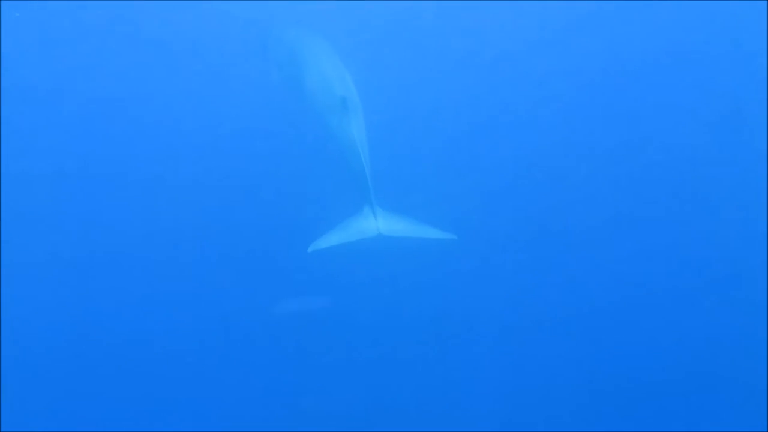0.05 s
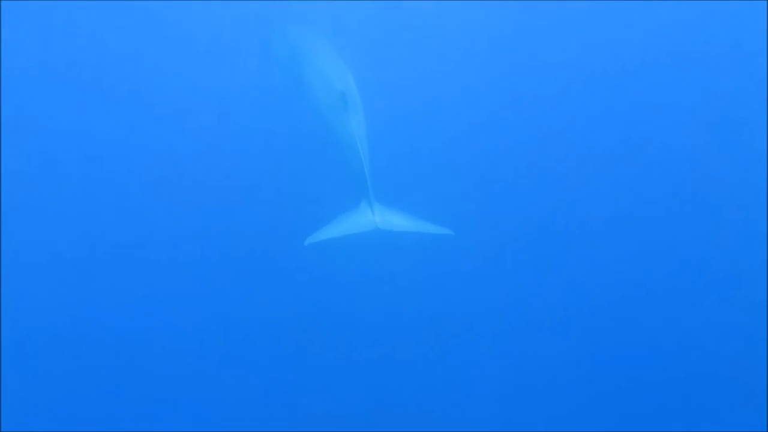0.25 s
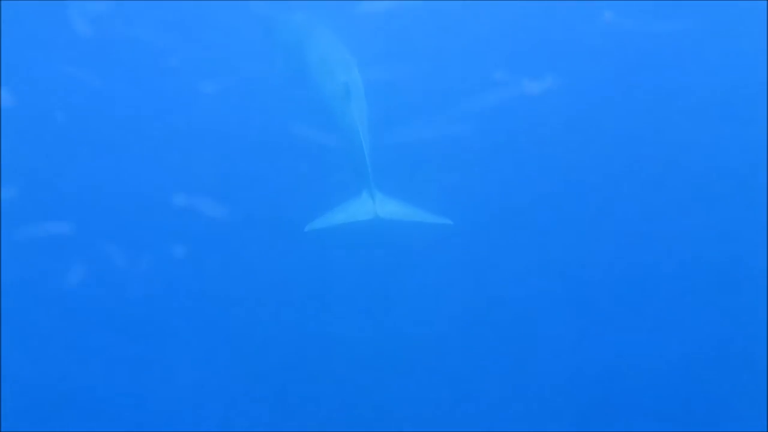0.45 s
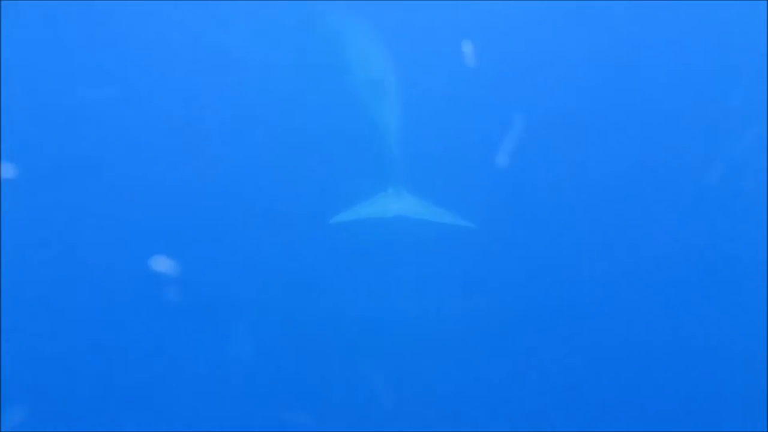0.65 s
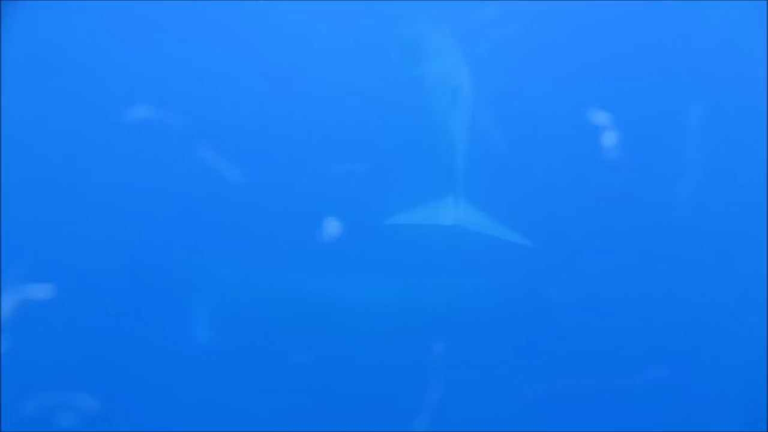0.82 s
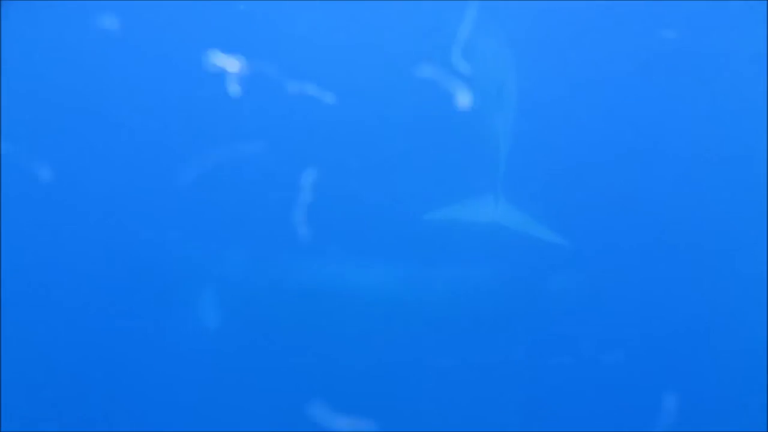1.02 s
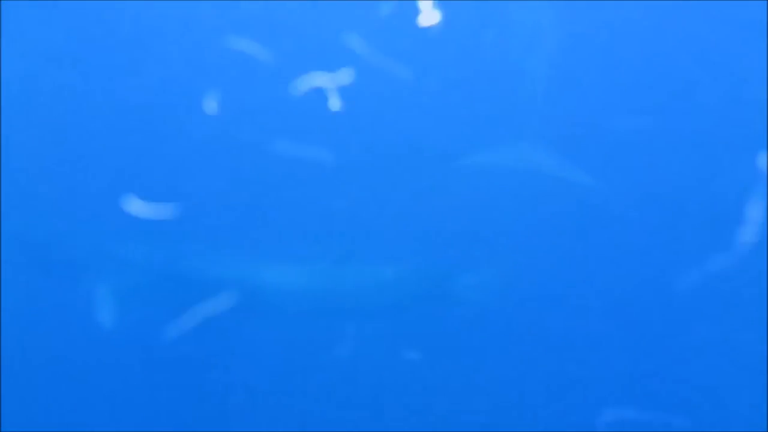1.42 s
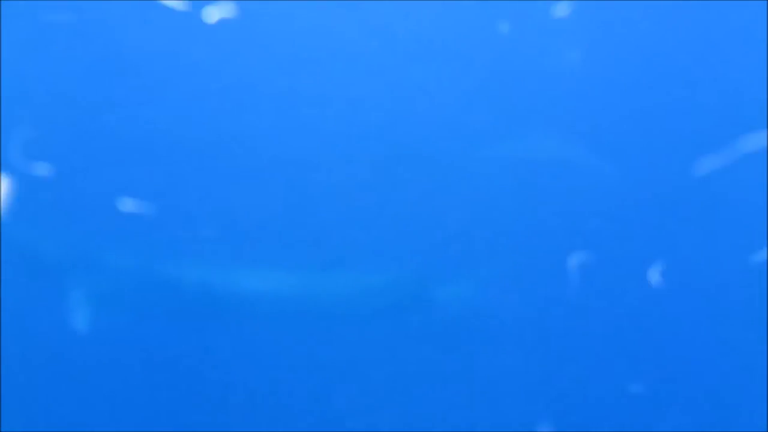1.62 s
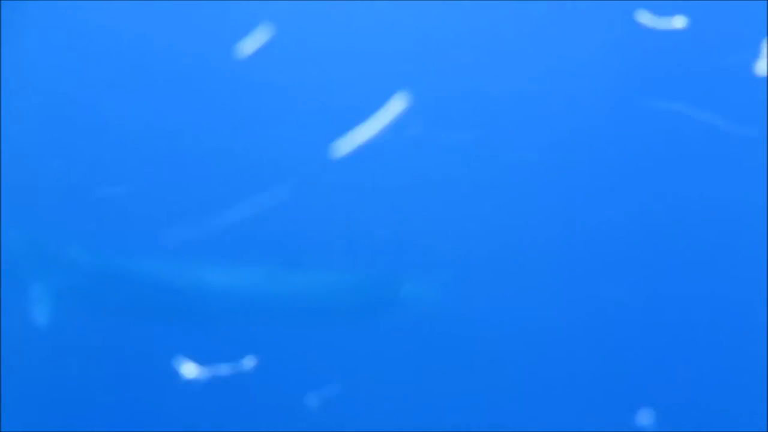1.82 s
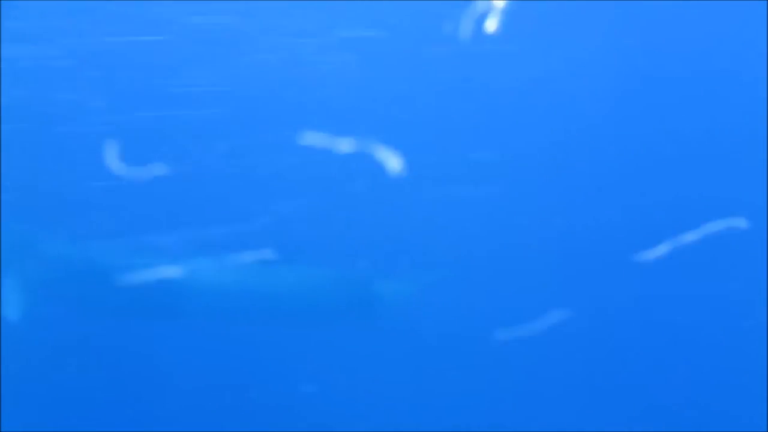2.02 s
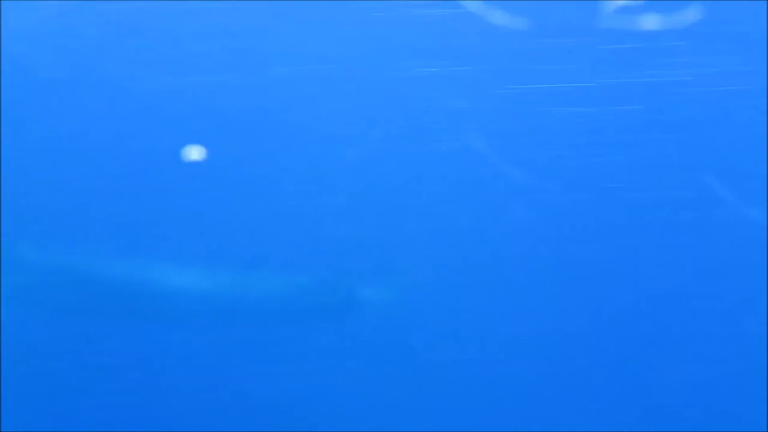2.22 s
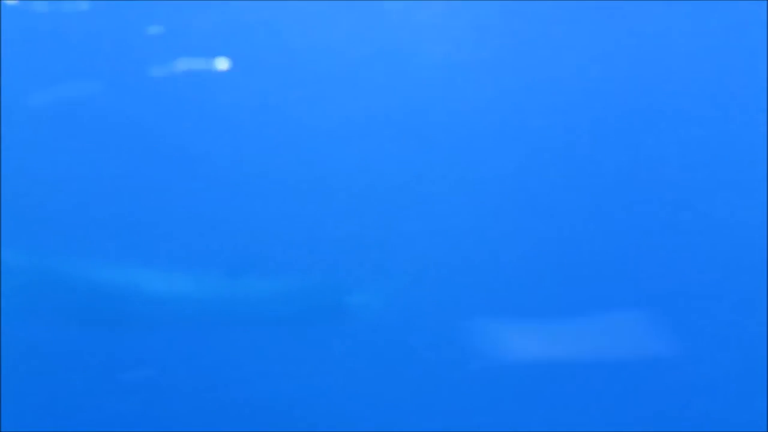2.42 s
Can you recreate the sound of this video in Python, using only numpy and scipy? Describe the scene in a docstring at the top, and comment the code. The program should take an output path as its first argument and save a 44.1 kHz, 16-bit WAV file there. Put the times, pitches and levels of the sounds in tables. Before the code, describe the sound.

Bubbles gurgle around a submerged camera in the open sea. A few quiet glugs give way to a sudden churning wash with trickling, fizz and small frothy slaps, ending in one big gulp over a low rumble.

```python
"""A wash of air bubbles hits a camera housing just under the surface of the open sea, after a few quiet glugs.
Each bubble is a short ring that rises in pitch as it fades: big ones gulp and gurgle, smaller ones
churn and trickle, the finest fizz and spit on the case. Froth slaps and cracks against it, and near
the end one big air pocket bends upward. The loud gulps ring the hollow housing, over the low
rumble of the flow and a faint hiss."""
import sys
import numpy as np
from scipy import signal
from scipy.fft import rfft, irfft, next_fast_len
from scipy.io import wavfile
from scipy.ndimage import uniform_filter1d

SR = 44100
rng = np.random.default_rng(int(sys.argv[2]) if len(sys.argv) > 2 else 0)


def wrap_up_sound(samples):
    """Save the sound to the file named by the first command line argument, as 16-bit audio."""
    columns = np.atleast_2d(samples).T
    # keep every value between -1 and 1, then stretch to whole-number steps
    tamed = np.clip(columns, -1, 1)
    steps = np.round(tamed * 32767).astype(np.int16)
    wavfile.write(sys.argv[1], SR, steps)


N = 112454


def undb(db):
    """Decibels to gain."""
    return 10 ** (np.asarray(db) / 20)


def unit(x):
    """Scale to rms 1."""
    return x / np.sqrt(np.mean(x ** 2))


def curve(rows, column=1):
    """Automation lane: one column of a timed table, interpolated at every sample."""
    rows = np.array(rows, float)
    return np.interp(np.arange(N) / SR, rows[:, 0], rows[:, column])


def colour(x, points, share=1):
    """Minimum-phase EQ through (freq_hz, gain_db) points; share scales the decibels."""
    size = 2 * next_fast_len(N)
    hz, db = np.array(points, float).T
    freqs = np.maximum(np.arange(size // 2 + 1) * SR / size, 1)
    gain = undb(share * np.interp(np.log(freqs), np.log(hz), db))
    cepstrum = irfft(np.log(gain))
    cepstrum[1:size // 2] *= 2  # folded onto positive time, so attacks have no pre-ring
    cepstrum[size // 2 + 1:] = 0
    return irfft(rfft(x, size) * np.exp(rfft(cepstrum)))[..., :N]


def fade(t60):
    """Time axis and envelope of a decay that drops 60 dB in t60 seconds."""
    t = np.arange(int(1.5 * t60 * SR) + 2) / SR
    return t, np.exp(-np.log(1000) * t / t60)


def flicker(rate_hz, depth_db):
    """Slewed sample-and-hold gain: a new random level rate_hz times a second."""
    hold = max(int(SR / rate_hz), 2)
    steps = np.repeat(rng.standard_normal(4000)[:N // hold + 1], hold)
    return undb(depth_db * uniform_filter1d(steps, hold // 2)[:N])


def add(out, start_s, sound):
    """Mix a sound in at start_s."""
    i = int(np.clip(start_s * SR, 0, N - 1))
    out[..., i:i + sound.shape[-1]] += sound[..., :N - i]


def bubble(hz, t60, min_swell_s=0):
    """A bubble swells for about a cycle, then rises in pitch as it fades; complex, peak 1."""
    swell_cycles, rise_per_t60 = 0.86, 0.084
    t, decay = fade(t60)
    swell_s = max(swell_cycles / hz, min_swell_s)
    envelope = decay * (1 - np.exp(-(t / swell_s) ** 2))
    phase = 2 * np.pi * hz * t * (1 + rise_per_t60 * t / t60 / 2)
    return envelope / envelope.max() * np.exp(1j * phase)


def swarm(low_hz, high_hz, per_s, t60_cycles, spread_db, width=0):
    """Bubbles at random times and pitches; width (0 to 1) puts left and right out of phase."""
    out = np.zeros((2, N))
    for when, pitch, size, ring, turn, lag in rng.random((8000, 6))[:int(per_s * N / SR)]:
        hz = low_hz * (high_hz / low_hz) ** pitch
        t60 = t60_cycles / hz * 2 ** (2 * ring - 1)  # half to double the typical ring
        gain = undb(-spread_db * np.log(.015 + size))  # many quiet, a few loud
        phases = np.exp(2j * np.pi * np.array([[turn], [turn + width * (lag - .5)]]))
        add(out, when * N / SR, gain * (phases * bubble(hz, t60)).imag)
    return out


def hiss_bed():
    """A faint, even hiss under everything, part wide and part centred."""
    # hiss EQ: freq_hz, gain_db
    eq = [(1000, -3), (3000, -3), (8500, -17.5), (15000, -28.5)]
    noise = rng.standard_normal((2, N)) + rng.standard_normal(N)
    return undb(-71) * unit(colour(noise, eq))


def rumble():
    """Eddies in the flow press on the housing: low, surging noise."""
    # surges of the flow: time_s, level_db
    levels = [(0, -52.5), (.32, -54.5), (.38, -43), (.55, -49), (.85, -43.5), (1.15, -41.5), (1.35, -46.5),
              (1.75, -44), (1.95, -51), (2.1, -47.5), (2.55, -52.5)]
    # rumble EQ: freq_hz, gain_db
    eq = [(15, -34), (30, -11), (50, -4.5), (80, 3), (96, -2.5), (113, 4.5), (135, -5), (200, -27),
          (400, -9.5), (1500, -65)]
    return unit(colour(rng.standard_normal(N), eq)) * undb(curve(levels))


def lapping():
    """Water laps softly at the housing before the wash arrives."""
    # soft laps: time_s, level_db
    levels = [(0, -43), (.06, -61.5), (.085, -47), (.16, -65.5), (.24, -48.5), (.27, -58.5), (.3, -52),
              (.34, -64), (.4, -90)]
    # lapping bubbles: low_hz, high_hz, per_s, t60_cycles, spread_db
    bubbles = (520, 1480, 630, 65, 7.1)
    # lapping EQ: freq_hz, gain_db
    eq = [(300, -6), (750, -8), (1000, -2), (1320, 1.5), (1480, 1), (2500, -18)]
    return unit(colour(swarm(*bubbles), eq)) * undb(curve(levels))


def fizz():
    """The finest bubbles ping in tiny clouds and merge into a soft hiss."""
    # fizz swells, before the 3 dB lift: time_s, level_db
    levels = [(0, -90), (.338, -90), (.346, -58), (.39, -54), (.44, -61), (.46, -70), (.6, -69), (.8, -65),
              (1.1, -68), (1.35, -68), (1.6, -64), (1.68, -56.5), (1.8, -60), (1.95, -61), (1.99, -68),
              (2.12, -66), (2.19, -61), (2.26, -62), (2.3, -73), (2.55, -70.5)]
    # finest bubbles: low_hz, high_hz, per_s, t60_cycles, spread_db
    bubbles = (4000, 16560, 1600, 38, 4.9)
    # tone through the housing: freq_hz, gain_db
    eq = [(1500, -8), (3300, 14), (4300, 0.5), (6500, 2), (7200, -3), (8800, 1), (12900, -3.5),
          (14000, -0.5), (15700, -16)]
    hiss = undb(-2) * rng.standard_normal((2, N))
    pings = unit(swarm(*bubbles, width=1))
    clouds = (pings + hiss) * flicker(rate_hz=110, depth_db=4)
    return unit(colour(clouds, eq)) * undb(curve(levels) + 3)


def cracks():
    """Water breaks on the case in bright snaps about a millisecond long."""
    # snaps: start_s, level_db
    hits = [(0.2025, -56), (0.3452, -40), (1.6458, -35), (2.1849, -41)]
    envelope = np.zeros(N)
    _, decay = fade(t60=0.00083)
    for start_s, db in hits:
        add(envelope, start_s, undb(db) * decay)
    return envelope * np.sign(rng.standard_normal(N))


def spits():
    """Clusters of seven tiny bubbles spit on the case: the first leads, later ones are weaker."""
    # clusters, by lead bubble and before the trim: start_s, level_db, pitch_hz
    clusters = [(0.017, -49, 4600), (0.205, -45, 2600), (0.3635, -40, 8840), (0.380, -35, 4100),
                (0.3902, -31, 4250), (0.3905, -32, 6400), (0.4445, -28, 3100), (0.892, -38.5, 4070),
                (1.4387, -48, 4390), (1.6458, -36, 12500), (1.673, -36, 9900), (1.6778, -39, 4960),
                (1.683, -39, 10800), (1.692, -37, 4800), (1.7241, -34.5, 5900), (1.758, -34.5, 4270),
                (1.7666, -36.5, 6500), (1.8389, -47, 4770), (1.840, -44, 12700), (1.883, -45, 6420),
                (1.9327, -40, 5840), (2.1258, -42, 5340), (2.1849, -44.5, 10300), (2.242, -47, 5680)]
    length_s, t60, scatter_octaves = 0.005, 0.004, 0.39
    trim_db, fall_db = -5.5, -12.5
    out = np.zeros((2, N))
    for (start_s, db, hz), draws in zip(clusters, rng.random((len(clusters), 7, 4))):
        for k, (late, pitch, turn, lag) in enumerate(draws):
            late, octaves = (late, scatter_octaves * (2 * pitch - 1)) if k else (0, 0)
            gain = undb(db + trim_db + fall_db * np.sqrt(late))
            ring = gain * bubble(hz * 2 ** octaves, t60, min_swell_s=t60 / 10)
            phases = np.exp(2j * np.pi * np.array([[turn], [turn + (lag - .5) / 2]]))  # left, right
            add(out, start_s + late * length_s, (ring * phases).imag)
    return out


def slaps():
    """Slugs of frothy water smack the case: noise bursts that build and die."""
    # smacks: start_s, level_db, attack_s, t60_s
    hits = [(0.346, -31, 0.00042, 0.033), (0.864, -31, .002, 0.038), (1.671, -35, 0.0052, 0.077),
            (1.714, -35.5, 0.0045, 0.13), (1.764, -36, 0.0021, 0.055), (1.927, -27.5, 0.017, 0.075),
            (2.069, -31.5, 0.011, 0.039), (2.148, -32.5, 0.004, 0.033), (2.253, -26, 0.0033, 0.038)]
    # smack EQ: freq_hz, gain_db
    eq = [(90, -15.5), (220, 11), (430, 7), (650, -16.5), (900, 1), (1080, -10.5), (1270, 8.5), (1500, -2),
          (1750, -1.5), (2300, -6), (2800, -10.5), (3700, -23.5), (6400, -35), (8100, -34.5), (10000, -34),
          (15000, -54)]
    envelope = np.zeros(N)
    for start_s, db, attack_s, t60 in hits:
        attack = np.linspace(0, 1, int(attack_s * SR) + 1)
        _, decay = fade(t60)
        add(envelope, start_s, undb(db) * np.concatenate([attack, decay]))
    return envelope * unit(colour(rng.standard_normal(N), eq))


def trickle():
    """Tiny bubbles stream past with a bright tinkle."""
    # trickle swells: time_s, level_db
    levels = [(0, -68.5), (.338, -76.5), (.35, -45), (.44, -47), (.48, -65.5), (.7, -51), (1.0, -56.5),
              (1.35, -59.5), (1.6, -49.5), (1.75, -48.5), (2.0, -54.5), (2.26, -51.5), (2.33, -59),
              (2.55, -55)]
    # tiny bubbles: low_hz, high_hz, per_s, t60_cycles, spread_db
    bubbles = (1990, 4450, 900, 48, 4.4)
    # trickle EQ: freq_hz, gain_db
    eq = [(800, -14.5), (2000, -3), (2400, -1), (2740, 9.5), (2890, 1), (3030, 2.5), (3300, -7.5),
          (4200, -13.5), (12000, -18)]
    return unit(colour(swarm(*bubbles, width=0.37), eq)) * undb(curve(levels))


def churn():
    """Small bubbles crowd the midrange, over a froth of bubbles too many to tell apart."""
    # churn swells: time_s, level_db
    levels = [(0, -64.5), (.338, -68), (.35, -29.5), (.46, -45), (.87, -41), (1.2, -38), (1.35, -40),
              (1.6, -39), (1.75, -33.5), (1.88, -40.5), (1.94, -34), (2.01, -45.5), (2.08, -39),
              (2.12, -48), (2.19, -39), (2.26, -44), (2.36, -46.5), (2.55, -41.5)]
    # small bubbles: low_hz, high_hz, per_s, t60_cycles, spread_db
    bubbles = (563.6, 2055, 1300, 17.6, 3.95)
    # tone through the housing: freq_hz, gain_db
    eq = [(200, -23), (600, -0.5), (780, -3), (940, 4), (1100, 0), (1270, 5.5), (1480, -5), (1720, 6),
          (2050, -6.5), (3500, -20.5), (8000, -47)]
    noise = rng.standard_normal(N) * flicker(rate_hz=110, depth_db=6.5)
    froth = undb(-13) * unit(colour(noise, eq))
    rings = unit(colour(swarm(*bubbles, width=0.11), eq))
    return unit(rings + froth) * undb(curve(levels))


def gurgle():
    """Large bubbles ring low and give the wash its body."""
    # gurgle swells: time_s, level_db
    levels = [(0, -49.5), (.335, -66.5), (.36, -34.5), (.44, -38.5), (.49, -39.5), (1.1, -38), (1.21, -32),
              (1.28, -37.5), (1.6, -40), (1.72, -32), (1.86, -44), (1.94, -36), (2.0, -51.5), (2.07, -36),
              (2.12, -44), (2.27, -46), (2.55, -47)]
    # large bubbles: low_hz, high_hz, per_s, t60_cycles, spread_db
    bubbles = (172.2, 602, 420, 7.8, 1.64)
    # tone through the housing: freq_hz, gain_db
    eq = [(60, -41), (150, -4), (225, -4), (340, -3.5), (430, 5), (520, -5.5), (800, -5.5), (1500, -29),
          (4000, -65)]
    return unit(colour(swarm(*bubbles, width=0.053), eq)) * undb(curve(levels))


def air_pocket():
    """One big air pocket rings on, its pitch climbing as it nears the surface."""
    # path of the long gulp: time_s, pitch_hz, level_db
    glide = [(2.256, 399.5, -44), (2.263, 405, -18.5), (2.280, 393, -33), (2.298, 384, -28.5),
             (2.320, 424, -35), (2.334, 593, -35), (2.352, 560, -49)]
    t = np.arange(N) / SR
    gate = (t > glide[0][0]) & (t < glide[-1][0])
    phase = 2 * np.pi * np.cumsum(curve(glide)) / SR
    return gate * undb(curve(glide, column=2)) * np.sin(phase)


def housing(x):
    """The hollow ring of the case: a bank of decaying modes driven by x."""
    # case resonances: pitch_hz, t60_s, gain_db
    modes = [(224, 0.11, -10.5), (457.4, 0.051, 13.5), (589, 0.086, 10.5), (880, 0.1, -5.5),
             (1330, 0.013, 8.5), (1570, 0.12, -3), (2720, 0.14, -2), (2730, 0.049, -8)]
    out = np.zeros(N)
    for hz, t60, db in modes:
        t, decay = fade(t60)
        mode = 2 * decay / decay.sum() * np.sin(2 * np.pi * hz * t)  # unity gain at its own pitch
        out += undb(db) * signal.fftconvolve(x, mode)[:N]
    return out


def gulps():
    """Loud single bubbles pinch off close by; each throws a short splash, and both ring the case."""
    # close bubbles: start_s, pitch_hz, level_db, t60_s
    bubbles = [(0.032, 205, -33.5, 0.094), (0.038, 802, -34, 0.04), (0.042, 1200, -37, 0.027),
               (0.097, 204, -31.5, 0.11), (0.194, 222, -36, 0.08), (0.2, 750, -26, 0.081),
               (0.204, 1183, -34, 0.045), (0.261, 203, -37, 0.048), (0.357, 1280, -22, 0.034),
               (0.367, 1860, -23, 0.018), (0.39, 259.4, -25.5, 0.24), (0.402, 342, -29, 0.18),
               (0.423, 421, -20.5, 0.044), (0.431, 262, -17.5, 0.097), (0.432, 2090, -34, 0.025),
               (0.478, 323, -28.5, 0.039), (0.502, 960, -32.5, 0.04), (0.521, 651, -27.5, 0.1),
               (0.526, 940, -24, 0.048), (0.556, 2520, -35, 0.021), (0.601, 1170, -27, 0.021),
               (0.646, 983, -28.5, 0.054), (0.675, 587, -29.5, 0.088), (0.728, 1324, -26.5, 0.032),
               (0.738, 433.5, -27.5, 0.089), (0.866, 1230, -28, 0.031), (1.038, 388, -30, 0.1),
               (1.062, 464, -26.5, 0.089), (1.066, 882, -27.5, 0.049), (1.069, 1294, -30, 0.042),
               (1.085, 476, -26.5, 0.2), (1.102, 407, -27, 0.087), (1.144, 303, -25.5, 0.099),
               (1.148, 455, -21, 0.044), (1.164, 2755, -41.5, 0.032), (1.185, 1270, -30, 0.03),
               (1.189, 800, -25.5, 0.029), (1.205, 467, -25, 0.06), (1.22, 393, -20, 0.015),
               (1.248, 1290, -31, 0.037), (1.334, 306, -24, 0.033), (1.477, 488, -22, 0.018),
               (1.529, 970, -25.5, 0.018), (1.562, 478, -23.5, 0.061), (1.57, 1410, -22, 0.022),
               (1.576, 2995, -33, 0.024), (1.581, 1560, -21, 0.016), (1.618, 2840, -32.5, 0.017),
               (1.644, 2440, -27.5, 0.0099), (1.643, 1220, -23, 0.0069), (1.675, 582, -26.5, 0.095),
               (1.702, 3180, -36.5, 0.026), (1.71, 453, -21, 0.072), (1.717, 1150, -21.5, 0.016),
               (1.767, 566, -23.5, 0.018), (1.77, 1213, -21.5, 0.025), (1.776, 3120, -38, 0.013),
               (1.803, 1300, -26.5, 0.02), (1.806, 2750, -32.5, 0.045), (1.842, 1700, -24.5, 0.043),
               (1.88, 866, -28, 0.027), (1.889, 2704, -31, 0.041), (1.927, 523, -21, 0.02),
               (1.931, 746, -27.5, 0.061), (1.941, 425, -19, 0.009), (2.037, 1850, -28, 0.017),
               (2.063, 1666, -28.5, 0.048), (2.072, 561, -25.5, 0.029), (2.0833, 1820, -18.5, 0.027),
               (2.1442, 1365, -17.5, 0.0088), (2.2123, 1688, -21.5, 0.031), (2.243, 1720, -33, 0.094),
               (2.259, 1280, -26.5, 0.056), (2.264, 846, -22.5, 0.039)]
    case_db, splash_db = -14.5, -25
    rings, splash_envelope = np.zeros(N), np.zeros(N)
    _, burst = fade(t60=0.022)
    noise = rng.standard_normal(N)
    for start_s, hz, db, t60 in bubbles:
        add(rings, start_s, undb(db) * bubble(hz, t60, min_swell_s=0.001).imag)
        add(splash_envelope, start_s, undb(db) * burst)
    rings *= flicker(rate_hz=450, depth_db=2)  # the flow shakes the bubbles as they ring
    splash_rms = np.sqrt(np.mean(splash_envelope ** 2))
    splash = splash_rms * unit(housing(noise * splash_envelope))
    return rings + undb(case_db) * housing(rings) + undb(splash_db) * splash


def scene():
    """All the water layers, coloured a little differently at each side of the housing."""
    # left-over-right EQ shape, of which each side takes a share: freq_hz, gain_db
    side_eq = [(60, -0.5), (130, 0), (220, -2), (430, -3), (560, -4.5), (720, -12), (950, -13),
               (1100, -1.5), (1270, -0.5), (1500, -6.5), (1750, -3.5), (2050, -2.5), (2650, 6.5),
               (3400, -0.5), (4200, -8), (5200, 0.5), (13000, -3)]
    bubbles = gulps() + air_pocket() + gurgle() + churn() + trickle() + fizz()
    left, right = bubbles + rumble() + lapping() + slaps() + cracks() + spits() + hiss_bed()
    return np.array([colour(left, side_eq, share=0.29), colour(right, side_eq, share=-0.42)])


def record(dry):
    """The camera cuts the top with a steep low-pass."""
    cutoff_hz = 15700
    return signal.sosfilt(signal.ellip(10, .2, 80, cutoff_hz, fs=SR, output="sos"), dry)


dry = scene()
out = record(dry)
wrap_up_sound(out)
```